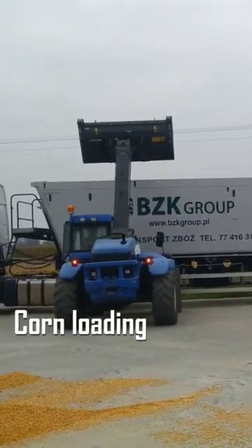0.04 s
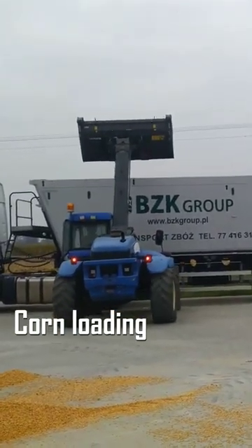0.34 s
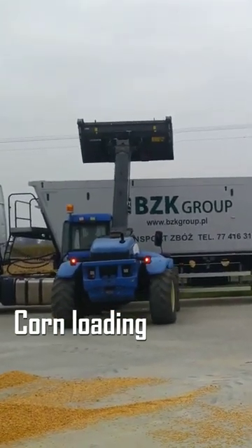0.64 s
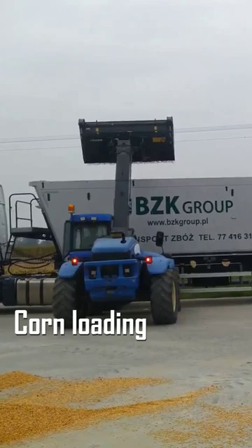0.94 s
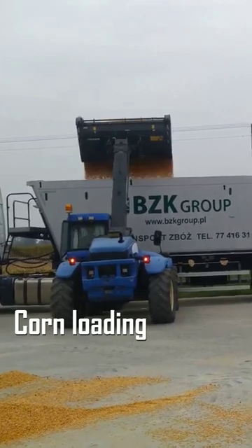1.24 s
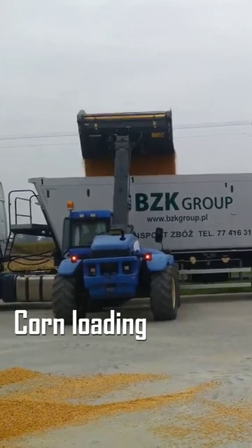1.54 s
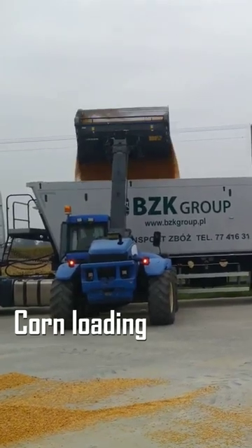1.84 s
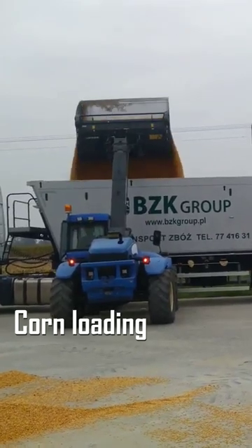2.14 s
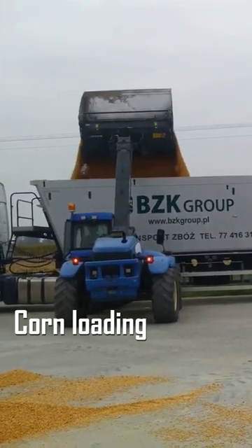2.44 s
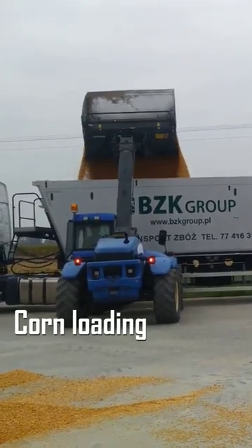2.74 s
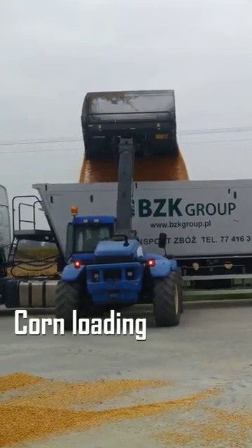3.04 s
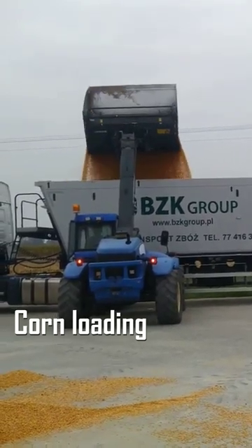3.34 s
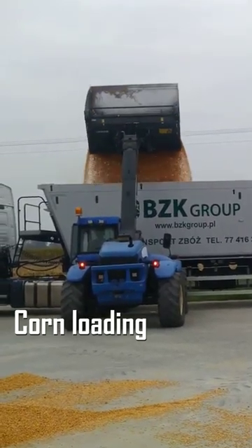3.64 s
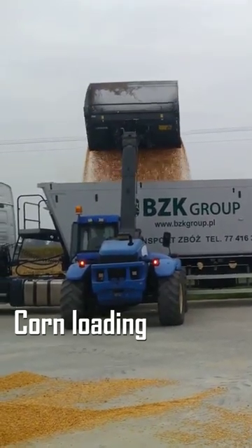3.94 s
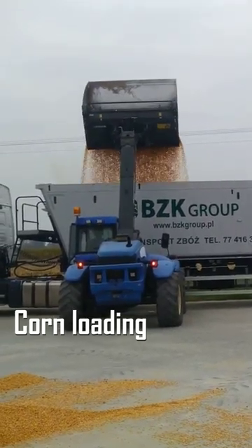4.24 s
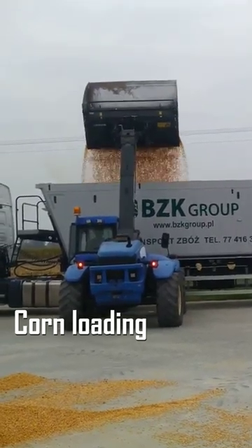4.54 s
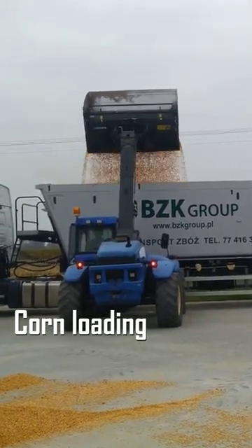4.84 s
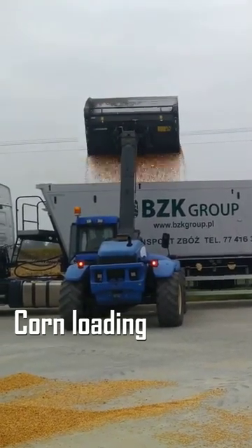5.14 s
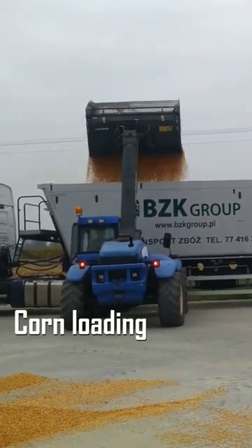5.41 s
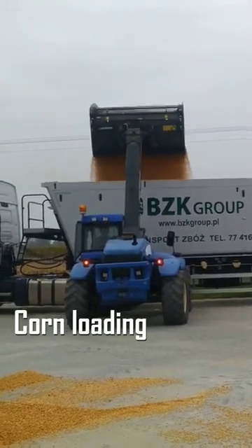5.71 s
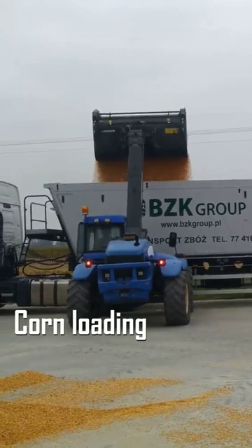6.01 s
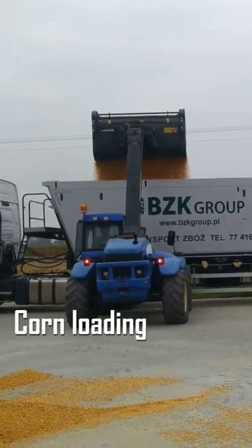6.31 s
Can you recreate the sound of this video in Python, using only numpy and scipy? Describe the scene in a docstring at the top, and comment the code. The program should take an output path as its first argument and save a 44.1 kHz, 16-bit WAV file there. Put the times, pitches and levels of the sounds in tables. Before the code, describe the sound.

A loader's diesel engine throbs and clatters just above idle in an outdoor yard, with a second engine humming underneath. After about a second, corn starts pouring into a trailer with a dense hiss. The hydraulics whine and the engine works harder as the heap scrapes out of the steel bucket in two surges. A few dull knocks and a thin, pulsing hydraulic whistle follow while the grain keeps falling.

```python
"""A four-cylinder diesel throbs and clatters just above idle, beating against a second, steady engine.
It drives a telehandler that tips a bucket of corn into a trailer, across a concrete yard.
Countless kernel impacts merge into a hiss, and the heap slides over resonant steel in two surges.
The hydraulics sing as the bucket tips back; each short pull on the tilt lever loads the engine,
strains the pump and shakes more corn loose."""
import sys
import numpy as np
from scipy import signal
from scipy.fft import rfft, irfft, next_fast_len
from scipy.io import wavfile
from scipy.ndimage import uniform_filter1d, map_coordinates

SR = 44100
rng = np.random.default_rng(int(sys.argv[2]) if len(sys.argv) > 2 else 0)


def master_out(mix):
    """Clip the mix to full scale and print it as 16-bit PCM to the path in sys.argv[1]."""
    frames = np.transpose(np.atleast_2d(mix))
    ceiling = np.clip(frames, -1, 1)
    pcm = np.round(ceiling * 32767).astype(np.int16)
    wavfile.write(sys.argv[1], SR, pcm)


N = 289737
TIME = np.arange(N) / SR


def amp(db):
    """The decibel scale: 20 dB is a factor of ten in amplitude."""
    return 10 ** (np.asarray(db) / 20)


def unit(x):
    """Normalisation to an rms of 1."""
    return x / np.sqrt(np.mean(x ** 2) + 1e-20)


def along(points, hz):
    """Interpolation of (frequency, value) points on a logarithmic frequency axis."""
    frequencies, values = np.transpose(points)
    return np.interp(np.log(hz + 1), np.log(frequencies), values)


def curve(points):
    """Linear interpolation of (time, value) points at every sample."""
    return np.interp(TIME, *np.transpose(points))


def turning(hz):
    """Phase in radians is the integral of frequency."""
    return 2 * np.pi * np.cumsum(hz) / SR


def wobble(rate_hz):
    """Random modulation: a smooth curve through rate_hz random values a second."""
    return map_coordinates(rng.standard_normal(2048), [TIME * rate_hz + 2], mode="wrap")


def ramp(start_s, rise_s):
    """A linear onset from 0 to a sustained 1."""
    return np.clip((TIME - start_s) / rise_s, 0, 1)


def swell(start_s, hold_s, attack_s, release_s):
    """Exponential growth and decay about a hold at 1, by 20 dB per attack or release time."""
    early = np.maximum(start_s - TIME, 0) / attack_s
    late = np.maximum(TIME - start_s - hold_s, 0) / release_s
    return amp(-20 * (early + late))


def filtered(x, response):
    """Linear filtering: the spectrum is multiplied by a frequency response."""
    size = next_fast_len(N + 8192)
    return irfft(rfft(x, size) * response(np.fft.rfftfreq(size, 1 / SR)), size)[..., :N]


def coloured(x, spectrum):
    """Spectral shaping by (frequency, gain) points, at rms 1."""
    return unit(filtered(x, lambda hz: amp(along(spectrum, hz))))


def ringing(x, modes):
    """Modal resonance: x drives parallel band-passes with steep skirts, at rms 1."""
    def peak(hz, centre_hz, half_width_hz):
        damping = 2j * hz * half_width_hz
        return (damping / (centre_hz ** 2 - hz ** 2 + damping)) ** 2
    return unit(filtered(x, lambda hz: sum(amp(db) * peak(hz, f, width) for f, width, db in modes)))


# Likeness of left and right: frequency_hz, coherence
COHERENCE = [(60, 1), (130, 0.82), (300, 1), (650, 0.88), (1300, 0.46), (2800, 0.15), (7000, 0.2),
             (15000, 0.075)]
def spread(pair):
    """Spatial coherence: two unrelated signals become alike in the bass and stay diffuse in the treble."""
    angle = lambda hz: np.arccos(np.clip(along(COHERENCE, hz), 0, 1)) / 2
    mid, side = filtered(pair, lambda hz: np.array([np.cos(angle(hz)), np.sin(angle(hz))]))
    return np.array([mid + side, mid - side])


def rush():
    """White noise, partly coherent between the channels."""
    return spread(rng.standard_normal((2, N)))


def impacts(rate_hz, scatter_db):
    """Shot noise: tiny impacts at random times and of uneven size."""
    hits = rng.random((2, N)) < rate_hz / SR
    sizes = rng.standard_normal((2, N)) * amp(scatter_db * rng.standard_normal((2, N)))
    return unit(spread(hits * sizes))


def patchy(x, depth_db):
    """Random modulation in short patches of time and frequency makes a hiss flicker."""
    spectra = signal.stft(x, nperseg=256)[2]
    field = uniform_filter1d(rng.standard_normal(spectra.shape[1:]), size=6, axis=0)
    field = uniform_filter1d(field, size=14, axis=1)
    return signal.istft(spectra * amp(depth_db * unit(field)), nperseg=256)[1][:, :N]


# The telehandler's crankshaft: time_s, rotation_hz
CRANK_SPEED = [(0, 24.07), (.25, 23.58), (1.13, 23.58), (1.17, 24.25), (1.43, 23.44), (1.91, 24.86),
               (2.61, 25.13), (2.85, 27.66), (3.08, 24.05), (3.19, 26.03), (3.78, 25.68), (4, 26.13),
               (4.34, 25.38), (4.49, 26.29), (4.7, 26.34), (4.97, 25.19), (5.24, 26.78), (5.66, 25.8),
               (6.13, 26.02), (6.57, 26.48)]
def crank_hz():
    """The rotation rate is the fundamental of which every shaft order is a multiple."""
    return curve(CRANK_SPEED)


def pull(centre_s, half_length_s=0.11):
    """A Gaussian envelope: one smooth pull on the tilt lever."""
    return np.exp(-((TIME - centre_s) / half_length_s) ** 2)


# Short pulls on the tilt lever: centre_s, strength_fraction, whistle_db, whirr_db
LEVER_PULLS = [(3.1, 0.1, -60, -62), (3.66, 0.6, -52, -64), (4.05, 1, -50, -44), (4.5, 1, -66, -42),
               (4.95, 0.75, -47, -56), (5.39, 0.75, -41.5, -41), (5.87, 0.2, -48, -70),
               (6.25, 0.85, -44.5, -50)]
def lever():
    """Superposed pulls give the lever's travel, from 0 to about 1."""
    return sum(strength * pull(centre_s) for centre_s, strength, _, _ in LEVER_PULLS)


# The second engine's firing rate: time_s, rate_hz
HUM_RATE = [(0, 54.368), (3.3, 53.843), (6.57, 54.692)]
# Its tones: ratio_to_firing_rate
HUM_RATIOS = [1, 2, 3.35]
# Strength of each tone: level_db
HUM_LEVELS = [-38, -42.5, -56]
def second_engine():
    """Beating: a steady hum lies close in frequency to the telehandler's firing note."""
    rate_hz = curve(HUM_RATE)
    in_step_s = 5.93  # both engines fire together here
    phase_lead = turning(rate_hz - 2 * crank_hz())
    firing = turning(rate_hz) - np.interp(in_step_s, TIME, phase_lead)
    return np.sqrt(2) * sum(amp(db + 0.26 * wobble(3)) * np.cos(ratio * firing)
                            for ratio, db in zip(HUM_RATIOS, HUM_LEVELS))


# Uneven firing, the third shaft order: time_s, level_db
UNEVEN_FIRING = [(0, -32), (.38, -27), (.87, -33.5), (1.02, -30), (1.45, -29), (2.4, -40), (3.05, -32),
                 (3.47, -39.5), (3.77, -32), (4.02, -34), (4.58, -32), (4.74, -39.5), (5, -29), (5.3, -37),
                 (5.6, -30), (5.84, -42), (5.95, -29), (6.48, -37)]
# Exhaust harmonics: shaft_order, level_db
EXHAUST_ORDERS = [(4, -48.5), (5, -44.5), (6, -51.5), (7, -55.5)]
def exhaust(shaft, load):
    """A harmonic series: four cylinders fire twice a turn; the third order makes alternate pulses limp."""
    firing = amp(-28 + 0.23 * load + 0.26 * wobble(2.96)) * np.cos(2 * shaft)
    limp = amp(curve(UNEVEN_FIRING) + 0.8 * wobble(7)) * np.sin(3 * shaft)
    overtones = sum(amp(db + 2.5 * wobble(6)) * np.cos(order * shaft) for order, db in EXHAUST_ORDERS)
    return np.sqrt(2) * (firing + limp + overtones)


def throb(shaft, lag_rad, depth, edge):
    """Periodic modulation: one swell a turn, sharpened by the firing order."""
    angle = shaft - lag_rad
    return unit(np.exp(depth * np.cos(angle) + edge * np.cos(2 * angle)))


# The engine's deep rumble: frequency_hz, gain_db
RUMBLE_SPECTRUM = [(20, -30), (35, -8), (55, 2), (80, 2.5), (120, 1), (160, -5), (215, -14.5), (400, -55.5)]
# The engine's midrange body: frequency_hz, gain_db
BODY_SPECTRUM = [(120, -41), (220, -6.5), (320, 2.5), (450, -3), (540, -5), (620, -4), (720, -8.5),
                 (850, -11), (1400, -14.5), (3000, -17.5), (8000, -44)]
def engine_rumble(speed_hz, shaft, effort):
    """Broadband noise grows with effort; its bass follows the speed and its midrange throbs."""
    rumble_db = -34.5 + 0.62 * effort + 0.4 * (speed_hz - speed_hz.mean())
    rumble = amp(rumble_db) * coloured(rush(), RUMBLE_SPECTRUM)
    pulsing = rush() * throb(shaft, lag_rad=0.7, depth=0.074, edge=0.022)
    return rumble + amp(-38.5 + 0.7 * effort) * coloured(pulsing, BODY_SPECTRUM)


def struck(speed_hz, at_turns, every_turns, decay_s):
    """Exponential decay after blows of uneven strength that recur with the shaft's rotation."""
    count, turns_since = np.divmod(np.cumsum(speed_hz) / SR - at_turns, every_turns)
    strength = amp(2 * rng.standard_normal(256))[count.astype(int)]
    return strength * np.exp(-turns_since / speed_hz / decay_s)


# Diesel clatter: frequency_hz, gain_db
CLATTER_SPECTRUM = [(400, -0.5), (820, -9), (1060, 4), (1300, -0.5), (1600, -1), (2000, 0), (3000, -15),
                    (4400, -11.5), (6000, -16.5), (7400, -16.5), (9000, -24), (11000, -37.5), (15500, -42)]
# Combustion knocks within one turn: position_turns, gain_db
COMBUSTION_KNOCKS = [(.02, -0.5), (.15, -5.5)]
# Resonances of the block and covers: centre_hz, half_width_hz, gain_db
CASING_MODES = [(1070, 103, 1.5), (1796, 22, 7), (2083, 82, 0.5), (2480, 43, 0.5), (3040, 260, -10.5)]
# Resonances of the fine metallic ticking: centre_hz, half_width_hz, gain_db
TICK_MODES = [(5630, 110, -0.5), (6130, 100, -1.5)]
def engine_clatter(speed_hz, shaft, effort):
    """Impact excitation: combustion knocks ring the casing amid pulsing clatter and fine ticks."""
    pulses = throb(shaft, lag_rad=0.6, depth=0.22, edge=0.12) * amp(0.4 * wobble(40))
    clatter = amp(-43 + 0.86 * effort) * coloured(rush() * pulses, CLATTER_SPECTRUM)
    knocks = rush() * sum(amp(db) * struck(speed_hz, at_turns, every_turns=1, decay_s=0.0042)
                          for at_turns, db in COMBUSTION_KNOCKS)
    casing = ringing(knocks, CASING_MODES) + amp(-8) * coloured(knocks, CLATTER_SPECTRUM)
    clack = amp(-47 + 0.86 * effort) * casing
    ticks = amp(-56.5) * ringing(impacts(rate_hz=900, scatter_db=3.5) * pulses, TICK_MODES)
    tap = struck(speed_hz, at_turns=2.22, every_turns=4, decay_s=0.003)
    sharp_tick = amp(-47) * tap * ringing(rush(), TICK_MODES)
    return clatter + clack + ticks + sharp_tick


# Engine load from tipping the full bucket: time_s, load_above_idle
TIPPING_LOAD = [(1.75, 0.54), (2.45, 5.5), (2.75, 3), (3.3, 0.88), (4.5, 1.85), (6.57, 1.25)]
def diesel():
    """Synchronous sources: one crankshaft times exhaust, throb and clatter, and load raises their level."""
    speed_hz = crank_hz()
    shaft = turning(speed_hz)
    load = curve(TIPPING_LOAD)
    effort = load + 2 * lever()
    return (exhaust(shaft, load) + engine_rumble(speed_hz, shaft, effort)
            + engine_clatter(speed_hz, shaft, effort))


def wavering(pitch_hz, rate_hz):
    """Narrowband noise: a tone whose amplitude and phase drift at rate_hz."""
    phase = turning(pitch_hz)
    pair = [unit(wobble(rate_hz) * np.cos(phase) + wobble(rate_hz) * np.sin(phase)) for _ in "LR"]
    return spread(np.array(pair))


# The pump's pressure ripple: shaft_order, level_db
RIPPLE_ORDERS = [(10, -53.5), (20, -47.5), (21, -53)]
# The hydraulic whirr: time_s, pitch_hz
WHIRR_PITCH = [(0, 602.5), (1.6, 644), (2.5, 601), (3.1, 570.5), (3.7, 561), (6.57, 557.6)]
def pump():
    """Pressure ripple sings at shaft harmonics; a whirr sinks as the bucket empties, swelling at pulls."""
    shaft = turning(crank_hz())
    whirr_hz = curve(WHIRR_PITCH)
    pressure = ramp(start_s=1.5, rise_s=0.74)
    ripple = pressure * sum(amp(db + 2.5 * wobble(9)) * np.cos(order * shaft + 0.5 * wobble(22))
                            for order, db in RIPPLE_ORDERS)
    whirr = amp(-53) * wavering(whirr_hz, rate_hz=16)
    pulls = sum(amp(db) * pull(centre_s) for centre_s, _, _, db in LEVER_PULLS)
    swells = pulls * np.cos(turning(whirr_hz) + 0.28 * wobble(25))
    strain = amp(-49.5 + 5.5 * lever()) * pressure * wavering(whirr_hz, rate_hz=120)
    return np.sqrt(2) * (ripple + swells) + whirr + strain


# Resonances of the hydraulic valve: centre_hz, half_width_hz, gain_db
VALVE_MODES = [(8365, 30, -2), (8450, 32, 0), (8520, 40, -7), (8700, 45, -7)]
def valve():
    """Narrow resonances turn noise into an airy whistle as the bucket tips back, swelling at each pull."""
    steady = amp(-47.5) * ramp(start_s=3.53, rise_s=0.86)
    surges = [amp(db) * pull(centre_s + 0.049) for centre_s, _, db, _ in LEVER_PULLS]
    envelope = np.linalg.norm([steady, *surges], axis=0)  # incoherent parts add in power
    leftward = amp([[1.5], [-6]])
    return envelope * leftward * ringing(rush(), VALVE_MODES)


# Knocks of the bucket's linkage: peak_s, level_db
LINKAGE_KNOCKS = [(1.67, -39), (2.58, -38), (3.14, -34.5), (4.549, -34), (4.97, -31), (5.85, -45)]
# Their dull thud: frequency_hz, gain_db
THUD_SPECTRUM = [(60, -22), (140, -8), (550, 6), (900, 2.5), (2400, -1), (4000, -8.5), (9000, -32)]
# Booms of steel panels: start_s, pitch_hz, level_db
PANEL_BOOMS = [(1.68, 560, -42), (1.719, 135, -43), (2.41, 526, -42), (2.57, 314, -40.5), (4.54, 510, -36),
               (4.56, 144, -37), (5.85, 324, -37.5)]
def jolts():
    """Damped vibration: the linkage knocks dully and steel panels boom briefly, each at one pitch."""
    knocks = sum(amp(db) * swell(peak_s, hold_s=0, attack_s=0.01, release_s=0.0733)
                 for peak_s, db in LINKAGE_KNOCKS)
    booms = np.zeros(N)
    for start_s, pitch_hz, db in PANEL_BOOMS:
        envelope = amp(db) * swell(start_s, hold_s=0.031, attack_s=0.017, release_s=0.077)
        booms += envelope * np.sin(2 * np.pi * pitch_hz * (TIME - start_s))
    return knocks * coloured(rush(), THUD_SPECTRUM) + np.sqrt(2) * booms


SLIP_ATTACK_S, SLIP_RELEASE_S = 0.084, 0.17
# The heap gives way: start_s, hold_s, scrape_db, spill_db
HEAP_SLIPS = [(2.49, 0.027, -51, -53), (2.76, 0.11, -31.5, -41.5), (3.106, 0.078, -41, -46),
              (3.212, 0.045, -33.5, -52), (3.34, 0.042, -30.5, -43)]
# Corn rubbing on steel: frequency_hz, gain_db
SCRAPE_SPECTRUM = [(900, -9.5), (1580, -4), (1850, 2), (2700, 2), (3500, -2), (5000, -1), (7000, -6.5),
                   (9000, -18), (11000, -25), (15500, -40)]
# Resonances of the steel bucket: centre_hz, half_width_hz, gain_db
BUCKET_MODES = [(1893, 51, -6), (2242, 61, -8), (2525, 200, -14)]
def corn_slide():
    """Sliding friction: the heap creeps, then slips along the bucket's floor and makes the steel ring."""
    creep = amp(-46.5) * swell(start_s=2.4, hold_s=0.88, attack_s=0.89, release_s=0.4)
    slips = [amp(db) * swell(start_s, hold_s, SLIP_ATTACK_S, SLIP_RELEASE_S)
             for start_s, hold_s, db, _ in HEAP_SLIPS]
    trickle = amp(-55) * ramp(start_s=2.4, rise_s=2.3)
    envelope = np.linalg.norm([creep, trickle, *slips], axis=0)
    rubbing = impacts(rate_hz=11000, scatter_db=-1) * amp(1.1 * wobble(60))
    steel = amp(-4.5) * ringing(impacts(rate_hz=4000, scatter_db=-0.5), BUCKET_MODES)
    return envelope * (coloured(rubbing, SCRAPE_SPECTRUM) + steel)


# The stream of falling corn: time_s, level_db
CORN_FLOW = [(1.56, -56), (1.68, -45.5), (1.88, -42.5), (2.6, -39.5), (3.15, -36.5), (4.55, -42.5),
             (5.45, -42), (5.62, -44.5), (5.88, -39), (6.57, -39.5)]
# Kernels landing on the load: frequency_hz, gain_db
KERNEL_SPECTRUM = [(500, -20), (1200, 2.5), (2000, 5), (3200, 1), (4600, 0), (6200, 2.5), (7500, 4),
                   (9300, 2.5), (10600, -6.5), (12500, -8.5), (15500, -7)]
def corn_pour():
    """Incoherent summation: thousands of kernel impacts merge into a hiss; slips and pulls spill more."""
    shaken_db = 1.5 * lever()
    stream = ramp(start_s=1.28, rise_s=0.071) * amp(curve(CORN_FLOW) + shaken_db)
    spills = [amp(db) * swell(start_s, hold_s, SLIP_ATTACK_S, SLIP_RELEASE_S)
              for start_s, hold_s, _, db in HEAP_SLIPS]
    envelope = np.linalg.norm([stream, *spills], axis=0)
    clumps = amp(0.4 * wobble(30))
    kernels = patchy(impacts(rate_hz=26000, scatter_db=0), depth_db=2) * clumps
    return envelope * coloured(kernels, KERNEL_SPECTRUM)


def scene():
    """Superposition: the pressures of all the sources in the yard add."""
    return diesel() + second_engine() + pump() + corn_pour() + corn_slide() + jolts() + valve()


# Imbalance of the microphones: frequency_hz, left_minus_right_db
MIC_BALANCE = [(60, 1.5), (110, 1.5), (200, 5.5), (380, 7.5), (700, 13.5), (1290, 4), (2380, 2.5),
               (4400, -3.5), (8000, 4), (9500, 0.5), (12000, -5), (15000, -5.5)]
# Narrow dips in the treble: centre_hz, half_width_hz, depth_db
TREBLE_DIPS = [(3986, 91, 22), (8080, 176, 13)]
def record(dry):
    """Level and time differences: two unequal microphones, the left one reached a little later."""
    lag_s, cutoff_hz = 0.000321, 15600

    def response(hz):
        dip_db = sum(db * np.exp(-((hz - centre) / width) ** 2) for centre, width, db in TREBLE_DIPS)
        left = amp(along(MIC_BALANCE, hz) / 2) * np.exp(-1j * np.pi * hz * lag_s)
        return amp(-dip_db) * np.array([left, 1 / left])  # each side takes half of the difference
    return filtered(filtered(dry, response), lambda hz: hz < cutoff_hz)


dry = scene()
out = record(dry)
master_out(out)
```